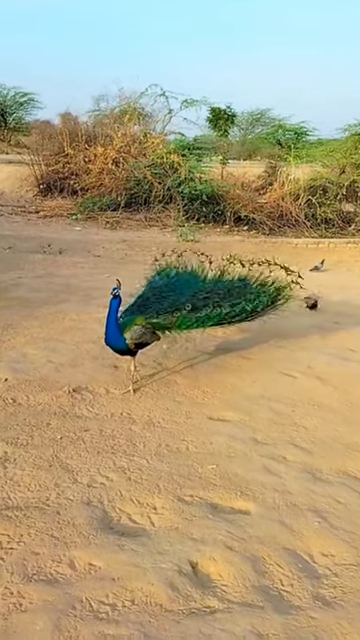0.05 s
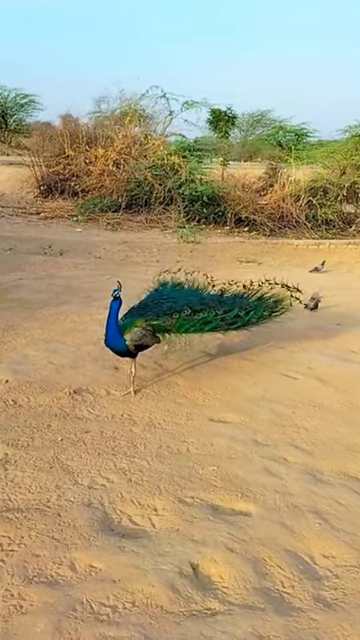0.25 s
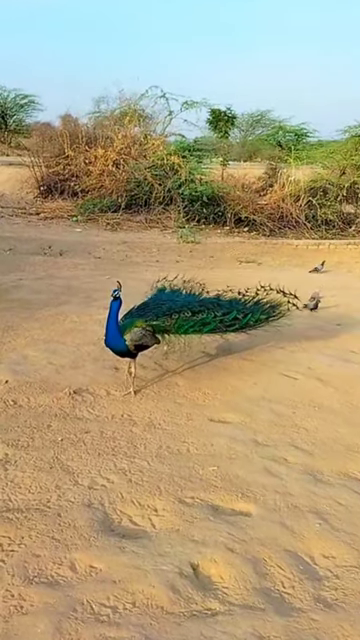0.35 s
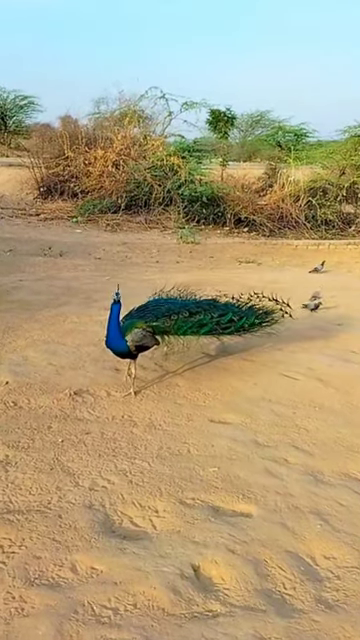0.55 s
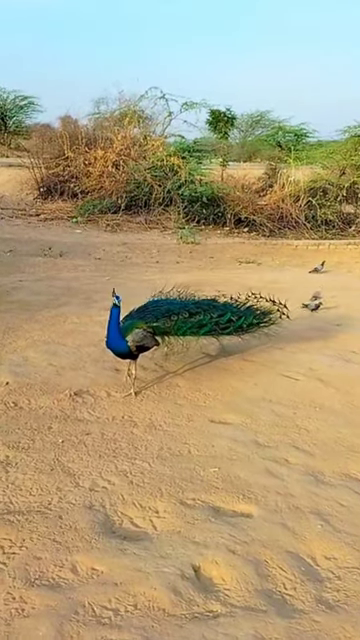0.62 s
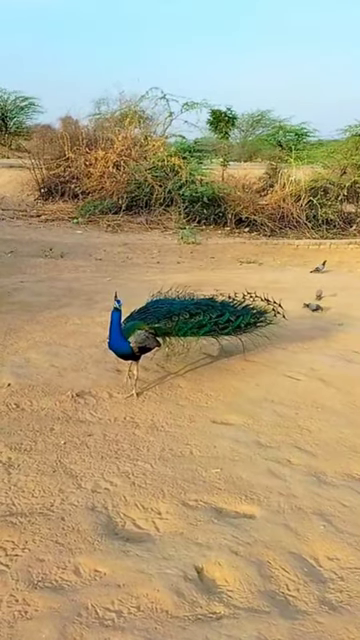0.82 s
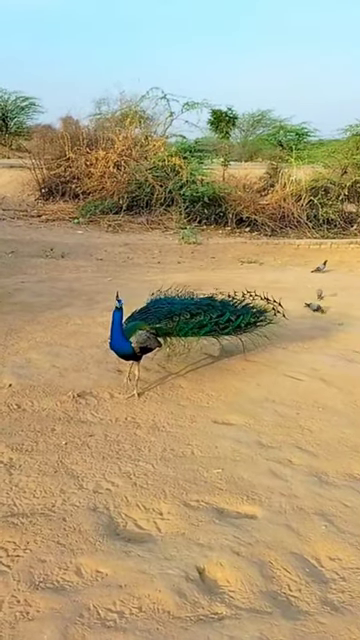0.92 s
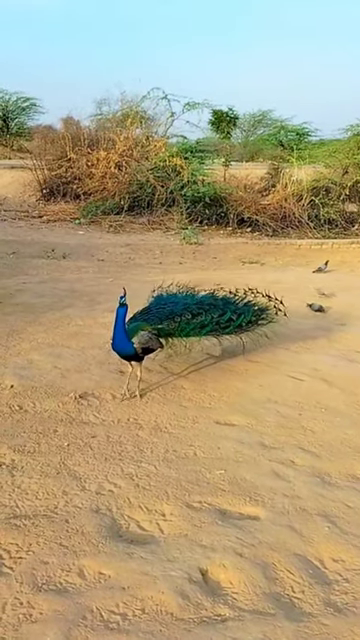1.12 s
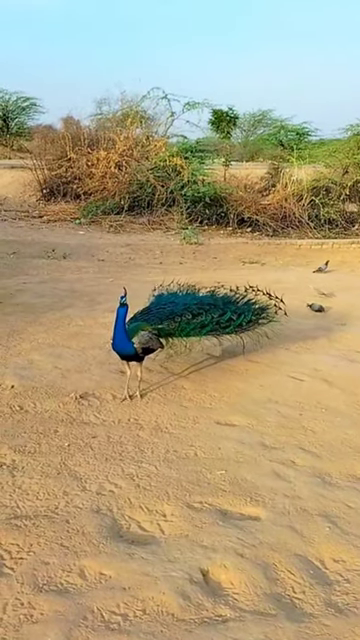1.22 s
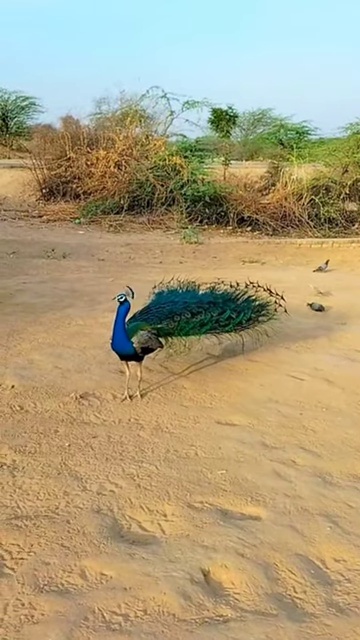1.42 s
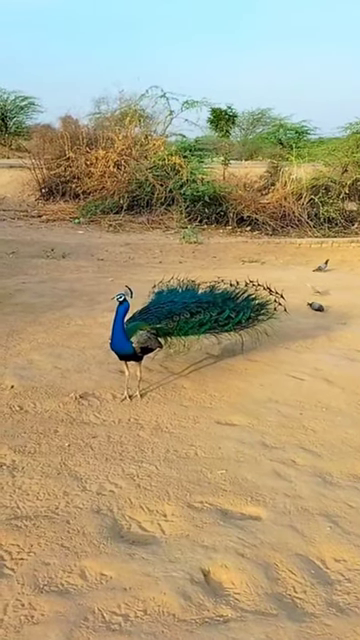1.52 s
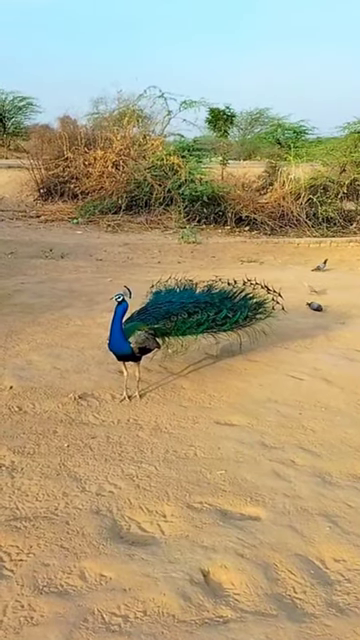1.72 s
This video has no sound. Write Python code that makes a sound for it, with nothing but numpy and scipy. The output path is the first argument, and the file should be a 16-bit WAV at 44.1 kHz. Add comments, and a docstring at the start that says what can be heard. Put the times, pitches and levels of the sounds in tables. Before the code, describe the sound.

A peacock gives one harsh, falling call while small birds chirp faintly around it.

```python
"""On open sandy ground a peacock gives one harsh, falling call; distant scrub throws it back.
A fast flutter flips its voice between a smooth note and a higher rasp, ringing in a fixed throat.
Small birds whistle short chirps around it, and a faint flock twitters farther away.
Behind them are three dry ticks and quiet outdoor air."""
import sys
import numpy as np
from scipy import signal
from scipy.fft import rfft, irfft
from scipy.io import wavfile
from scipy.ndimage import uniform_filter1d

SR = 44100
rng = np.random.default_rng(int(sys.argv[2]) if len(sys.argv) > 2 else 0)


def pcm_store(signal):
    """Save signal as 16-bit PCM."""
    levels = np.round(np.clip(np.atleast_2d(signal), -1, 1) * 32767)
    wavfile.write(sys.argv[1], SR, levels.astype(np.int16).T)


N = 77175
T = np.arange(N) / SR

# Each row: time in seconds, pitch in Hz, level in dB, relative treble in dB, flutter depth (1 is full).
CALL_SHAPE = [(0.198, 397.5, -47, 14.5, 0.59), (.205, 425.2, -32.5, 7, 0.42),
              (.223, 503.9, -26.5, 0.5, 1.09), (0.249, 549.3, -22.5, 3, 0.8),
              (0.279, 539.1, -23.5, 4, 0.88), (.306, 529, -24.5, 2.5, 0.89), (.346, 495.7, -28, 3, 0.7),
              (0.397, 461, -29, 1, 0.93), (.423, 448.5, -28.5, 2.5, 0.9), (0.458, 410.3, -31, 0.5, 0.22),
              (0.474, 389.9, -32.5, -2, 0), (.489, 369.5, -38.5, 3, 0.06), (.498, 336.7, -34.5, 1, 0.16),
              (.507, 306.3, -41.5, 6.5, 0.24), (0.531, 260.1, -59.5, 1, 0)]
# Each row: time in seconds, flutters per second.
FLUTTER_RATE = [(.21, 89.1), (.25, 83.06), (.29, 74.85), (.45, 74.36)]
# How the low overtones throb. Each row: time in seconds, swing in dB, lag behind the rasp in radians.
LOW_THROB = [(.21, 2, 0.72), (.25, 3, 0.82), (.315, 2, 0.73), (.36, 1, 0), (.41, 1, 0.13),
             (.47, -0.5, 0.21)]
# How the throat rings. Each row: frequency in Hz, gain in dB.
THROAT_TONE = [(250, -50), (560, -23.5), (720, -11), (900, -12.5), (1150, -6.5), (1400, -6), (1740, 0.5),
               (1900, -3.5), (2150, -7.5), (2450, -11), (2700, -19.5), (3100, -15.5), (3700, -19.5),
               (4070, -14.5), (4300, -19.5), (4530, -11.5), (4950, -19), (5800, -25), (6450, -21.5),
               (7100, -11.5), (7850, -26), (8300, -41.5), (10500, -55.5), (12000, -50), (13500, -61),
               (15500, -62)]
FLUTTER_PEAK_S, PITCH_SWING, TREBLE_HZ = .2088, .08, 3100
RASP_SWING_DB, RASP_UNEVEN_DB = 8, 1.1


def peacock():
    """A flutter flips the voice between a low smooth note and a higher rasp; both ring the throat."""
    times, hz, level_db, treble_db, depth = np.transpose(CALL_SHAPE)
    depth = np.clip(np.interp(T, times, depth), 0, 1)
    beats = np.cumsum(np.interp(T, *np.transpose(FLUTTER_RATE))) / SR
    flutter = 2 * np.pi * (beats - np.interp(FLUTTER_PEAK_S, T, beats))
    throb_times, throb_db, lag = np.transpose(LOW_THROB)
    throb_db = np.interp(T, throb_times, throb_db)
    flip = np.tanh(2 * np.cos(flutter - np.interp(T, throb_times, lag)))  # -1 smooth, +1 rasping
    pitch = np.interp(T, times, hz) * (1 + PITCH_SWING * depth * flip + .006 * wander(rate_hz=250))
    cycles = np.cumsum(pitch) / SR
    # Harmonics are tones at whole multiples of the pitch; these lag one another and drift.
    harmonics = np.array([np.cos(2 * np.pi * (k * cycles + .17 * k ** 2 + .018 * k * wander(200.9)))
                          for k in range(1, 36)])
    harmonics[0] *= amp(-18)
    harmonics[1] *= amp(2.2 * np.maximum(throb_db, 0) * (flip - 1) / 2)  # dips on the smooth note
    buzz = unit(harmonics.sum(0))
    rasp = buzz + .45 * rng.standard_normal(N)
    low = signal.sosfilt(signal.butter(6, TREBLE_HZ, fs=SR, output="sos"), buzz)
    high = signal.sosfilt(signal.butter(6, TREBLE_HZ, "high", fs=SR, output="sos"), rasp)
    rasp_db = RASP_SWING_DB * depth * np.cos(flutter) + RASP_UNEVEN_DB * wander(rate_hz=400)
    low *= amp(throb_db * flip)
    high *= amp(np.interp(T, times, treble_db) + rasp_db - 5.5)
    voice = ground_bounce(colour(low + high, THROAT_TONE))
    # Even out the loudness, then give it the call's rise and fall.
    voice /= np.sqrt(abs(uniform_filter1d(voice ** 2, size=1180)) + 1e-12)
    loudness = amp(np.interp(T, times, level_db, left=-150, right=-150))
    return voice * uniform_filter1d(loudness, size=200)


def ground_bounce(x, delay_s=.00245, db=-8):
    """The direct sound plus its bounce off the sand."""
    return x + amp(db) * np.interp(T - delay_s, T, x, left=0)


# Each row: frequency in Hz, gain of the scattered sound in dB.
SCATTER_TONE = [(950, -16), (1450, -14.5), (2300, -14), (4000, -11), (7000, -8), (12000, -30)]
# Each row: frequency in Hz, seconds to fade by 60 dB.
SCATTER_FADE = [(1100, .33), (1400, .8), (2200, .8), (4000, .32), (9000, .2)]


def scatter(x):
    """Ground and bushes return many tiny echoes; the middle frequencies last longest."""
    hz, t, noise = signal.stft(rng.standard_normal(SR), SR, nperseg=256)
    fade = amp(-60 * t / read(SCATTER_FADE, hz)[:, None])
    tail = signal.istft(noise * fade, SR, nperseg=256)[1]
    return colour(signal.fftconvolve(x, tail / np.linalg.norm(tail))[:N], SCATTER_TONE)


def reflections(x, fade_s):
    """Smears a sound into a cluster of echoes that fades by 60 dB in fade_s."""
    tail = rng.standard_normal(N) * amp(-60 * T / fade_s)
    return signal.fftconvolve(x, tail / np.linalg.norm(tail))[:N]


def far_echo(x, delay_s=.555, db=-28.5, centre_hz=1950, octaves=.5):
    """Distant scrub returns the call's middle frequencies, late and smeared."""
    hz = np.fft.rfftfreq(N, 1 / SR)
    band = 1 / (1 + (np.log2((hz + 1) / centre_hz) / octaves) ** 4)
    out = np.zeros(N)
    add(out, delay_s, reflections(irfft(rfft(x) * band, N), fade_s=.4))
    return amp(db) * out


# Each row: start in seconds, length in seconds, first, middle and last pitch in Hz, level in dB,
# then how far a second voice lies above the first in Hz and in dB.
BIRD_CHIRPS = [(0.081, 0.048, 4600, 5600, 5640, -56, -600, -5),
               (0.083, 0.054, 4160, 3574, 3800, -55, 21, -42),
               (0.124, 0.043, 3850, 3804, 3720, -48.5, -6, -47),
               (0.169, 0.087, 4250, 4720, 5270, -52, 325, 5),
               (0.515, 0.025, 5160, 5450, 5500, -51, -6, -45),
               (0.522, 0.0206, 2950, 3686, 4250, -55.5, 0, -45),
               (0.53, 0.0423, 3730, 4213, 4120, -48.5, 422, -6.5),
               (0.567, 0.033, 5320, 5540, 5300, -63, 0, -36),
               (0.804, 0.14, 3590, 3548, 3590, -62, 657.5, -1.5),
               (0.874, 0.068, 5540, 5770, 5820, -67.5, -8, -42),
               (0.904, 0.043, 3836, 4194, 3960, -50.5, 676, -5.5),
               (.933, 0.044, 3777, 4296, 3490, -44, 675, -7.5),
               (1.042, 0.055, 8520, 8700, 8670, -82.5, -5, -47),
               (1.218, .04, 3700, 3470, 3200, -67.5, 747, -1),
               (1.23, 0.093, 2730, 2600, 2570, -64.5, -250, -4),
               (1.158, 0.024, 3210, 3740, 4400, -69.5, -3, -40),
               (1.355, 0.023, 5800, 6730, 8500, -66.5, -7, -40),
               (1.368, 0.038, 4010, 4160, 4070, -53, -450, -11),
               (1.377, 0.0415, 5100, 5310, 5800, -57, -700, -9),
               (1.408, 0.038, 4880, 5470, 5700, -62.5, -1400, 0),
               (1.451, 0.037, 4150, 4106, 4310, -56.5, 134, -2),
               (1.484, 0.097, 4350, 5024, 5110, -52, 178, -9),
               (1.604, .03, 4130, 3810, 3220, -67, -1100, -10),
               (1.613, 0.015, 7430, 7150, 6960, -72, 0, -40),
               (1.614, 0.065, 2311, 2450, 2290, -69.5, -3, -36),
               (1.659, .07, 3400, 4070, 3840, -59.5, 1050, -6.5),
               (1.697, 0.055, 3670, 4270, 4080, -53.5, -330, -5)]
CHIRP_RISE, CHIRP_FALL = .05, .16  # shares of a chirp's length


def small_birds():
    """Each chirp is a curved whistle, often two-voiced; the fainter it is, the more the scrub blurs it."""
    out = np.zeros(N)
    for start, length, first_hz, mid_hz, last_hz, db, offset_hz, second_db in BIRD_CHIRPS:
        progress = np.arange(0, length, 1 / SR) / length
        n = len(progress)
        curve = np.polyfit([0, .5, 1], [first_hz, mid_hz, last_hz], 2)
        hz = np.polyval(curve, progress) * (1 + .016 * wander(rate_hz=398)[:n])
        ramp = np.clip(np.minimum(progress / CHIRP_RISE, (1 - progress) / CHIRP_FALL), 0, 1)
        blur = min(amp(-59 - db), 1.1) / 2
        voices = 0
        for shift_hz, gain in ((0, 1), (offset_hz, amp(second_db))):
            flicker = 1 + blur * (wander(110) + 1j * wander(110))[:n]
            whistle = np.exp(2j * np.pi * np.cumsum(hz + shift_hz) / SR)
            voices += gain * (flicker * whistle).real
        add(out, start, amp(db) * np.sin(np.pi / 2 * ramp) ** 2 * unit(voices))
    return out


def flock(per_second=36, low_hz=2600, high_hz=6000, typical_s=.03, faintest_db=-90):
    """Birds farther away whistle faint, quick glides."""
    out = np.zeros(N)
    for when, height, length, glide, loud in rng.random((int(per_second * N / SR), 5)):
        progress = np.linspace(0, 1, int(SR * typical_s * (.5 + length)))
        octaves = .42 * (2 * (2 * glide - 1) * (progress - .5) - (progress - .5) ** 2)
        hz = low_hz * (high_hz / low_hz) ** height * 2 ** octaves
        whistle = np.sin(np.pi * progress) * np.sin(2 * np.pi * np.cumsum(hz) / SR)
        add(out, when * N / SR, amp(faintest_db + 8.2 * loud) * unit(whistle))
    return out


# Each row: start in seconds, level before filtering in dB, treble limit in Hz.
DRY_TICKS = [(.787, -40.5, 9000), (.822, -45.5, 7000), (.975, -43, 1500)]
# Each row: frequency in Hz, gain for all ticks in dB.
TICK_TONE = [(200, -6), (1500, 2), (4000, -2), (7800, -6), (9300, -24), (15000, -32)]


def ticks(decay_s=.001):
    """Tiny dry snaps of noise, some bright and some dull."""
    out = np.zeros(N)
    for start, db, top_hz in DRY_TICKS:
        snap = rng.standard_normal(N) * np.exp(-T / decay_s)
        add(out, start, amp(db) * signal.lfilter(*signal.butter(2, top_hz, fs=SR), snap))
    return colour(out, TICK_TONE)


# The tone of the air and of a high hiss. Each row: frequency in Hz, relative level in dB.
AIR_TONE = [(15, -69.5), (25, -16.5), (85, -12), (125, -11), (167, -9.5), (579, -12), (990, -14),
            (1330, -15.5), (2110, -20), (2620, -14), (3110, -21), (3430, -18.5), (4600, -23), (4940, -23),
            (8450, -44.5), (11000, -63.5), (18600, -120)]
HISS_TONE = [(100, -23), (400, -4), (3000, -3.5), (4500, 3), (6000, -3.5), (7400, -1), (8400, -24),
             (11000, -27), (15000, -32)]
# Each row: time in seconds, hiss level in dB.
HISS_LEVEL = [(0, -58.5), (.1, -60.5), (.2, -59), (.55, -70.5), (1.1, -79.5), (1.75, -75)]
# Each row: start in seconds, length in seconds, pitch in Hz, level in dB.
FAR_TONES = [(0, 0.12, 567, -65), (.07, 0.17, 253.6, -66), (1.14, 0.22, 120.3, -71.5),
             (1.36, 0.25, 145, -75.5)]


def air(level_db=-64):
    """Quiet outdoor noise, a fading hiss and a few faint, far-off low tones."""
    out = amp(level_db + .09 * wander(4.6)) * unit(colour(rng.standard_normal(N), AIR_TONE))
    hiss_db = np.interp(T, *np.transpose(HISS_LEVEL)) + wander(40)
    out += amp(hiss_db) * unit(colour(rng.standard_normal(N), HISS_TONE))
    for start, length, hz, db in FAR_TONES:
        t = np.arange(0, length, 1 / SR)
        cycles = np.cumsum(hz * (1 + .047 * wander(36)[:len(t)])) / SR
        add(out, start, amp(db) * unit(np.sin(np.pi * t / length) * np.sin(2 * np.pi * cycles)))
    return out


def amp(db):
    """Turns decibels into a multiplier."""
    return 10 ** (np.asarray(db) / 20)


def unit(x):
    """Scales a signal to an average power of 1."""
    return x / np.sqrt(np.mean(x ** 2) + 1e-20)


def read(points, hz):
    """Looks up a frequency in a table, spacing octaves evenly."""
    row_hz, value = np.transpose(points)
    return np.interp(np.log(hz + 1), np.log(row_hz + 1), value)


def add(mix, start_s, sound):
    """Mixes a sound in at a given time."""
    part = mix[max(round(start_s * SR), 0):][:len(sound)]
    part += sound[:len(part)]


def colour(x, points, size=4096):
    """Filters a sound by a tone table, ringing only after the sound arrives."""
    log_gain = np.log(amp(read(points, abs(np.fft.fftfreq(size, 1 / SR)))))
    taps = np.fft.ifft(np.exp(np.conj(signal.hilbert(log_gain)))).real
    return signal.fftconvolve(x, taps[:size // 2])[:len(x)]


def wander(rate_hz, step=16):
    """A smooth random wobble of typical size 1, up to about rate_hz fast."""
    t = T[::step]
    hz = np.fft.rfftfreq(len(t), step / SR)
    spectrum = rfft(rng.standard_normal(len(t))) * np.exp(-(hz / rate_hz) ** 2)
    return np.interp(T, t, unit(irfft(spectrum, len(t))))


def scene():
    """The birds, their echoes, the ticks and the air, in one channel."""
    call = peacock()
    chirps = small_birds() + flock()
    near = amp(-14) * reflections(call, fade_s=.06)
    near += amp(-12) * reflections(chirps, fade_s=.1)
    scattered = scatter(call + amp(-3) * chirps)
    return (call + chirps + near + scattered + far_echo(call) + ticks() + air())[None]


def record(dry, top_hz=15500):
    """Cuts off the very highest treble."""
    taps = signal.firwin(511, top_hz, window=("kaiser", 9), fs=SR)
    return signal.oaconvolve(dry, taps[None], "same")


dry = scene()
out = record(dry)
pcm_store(out)
```